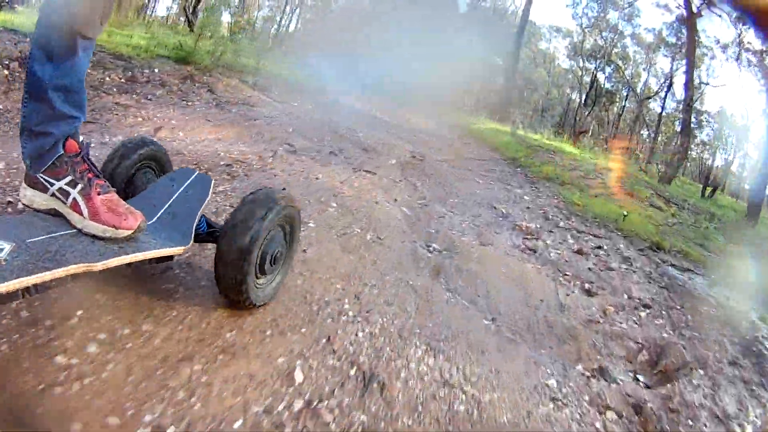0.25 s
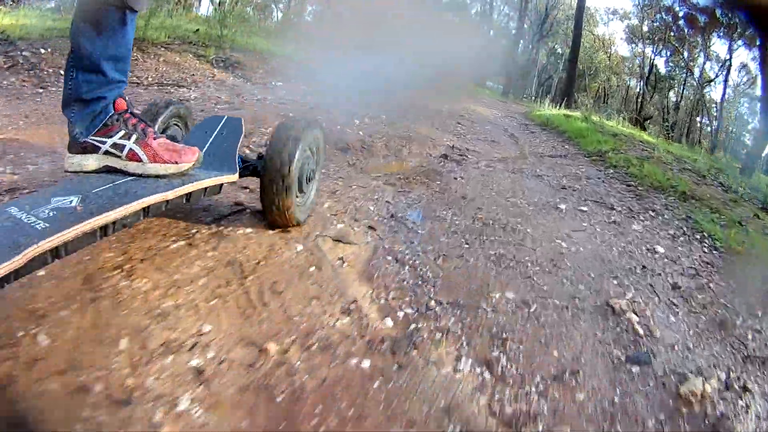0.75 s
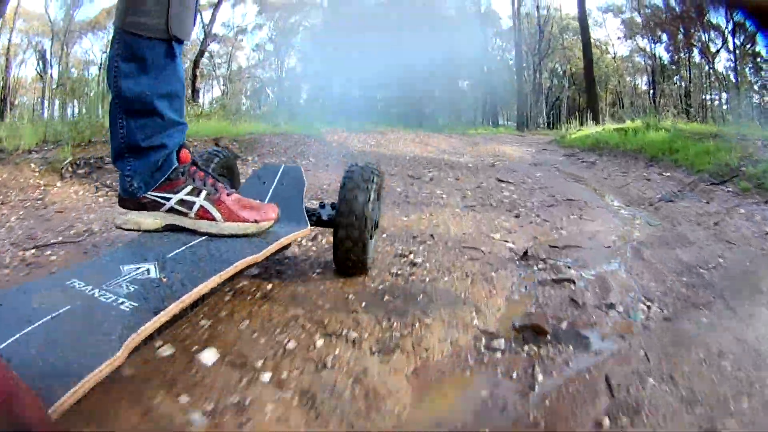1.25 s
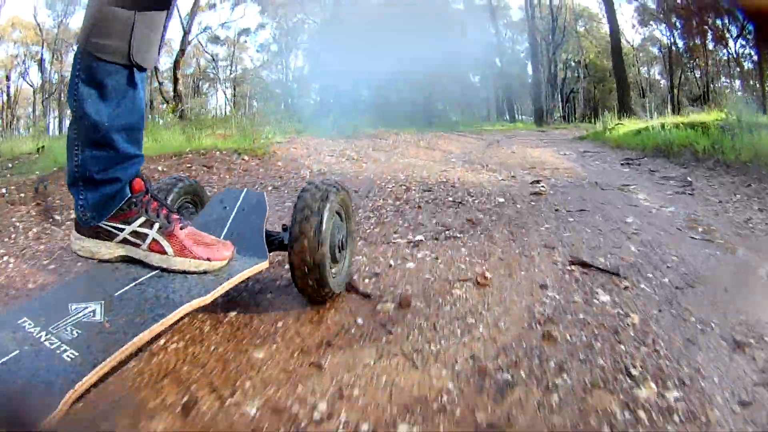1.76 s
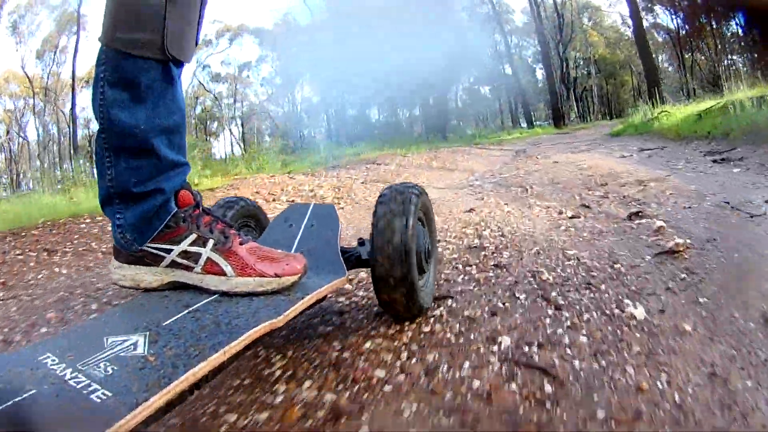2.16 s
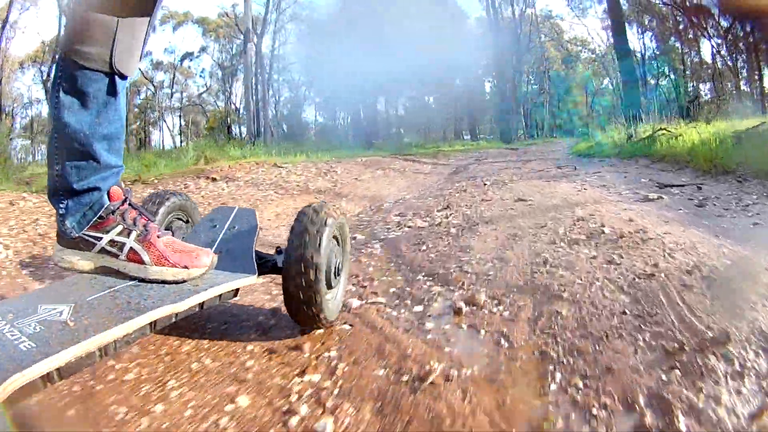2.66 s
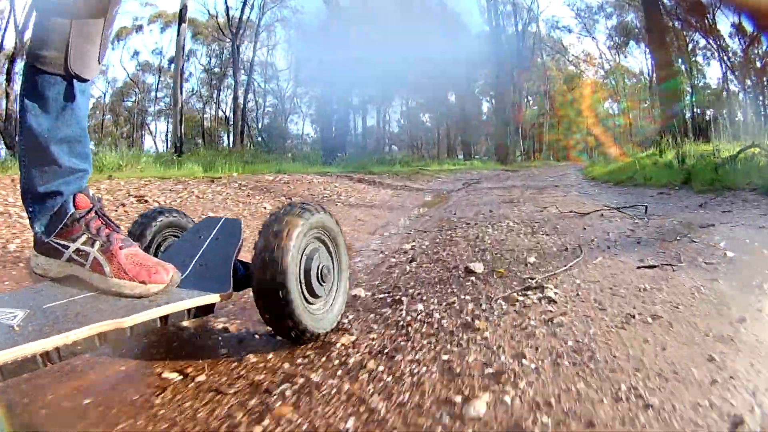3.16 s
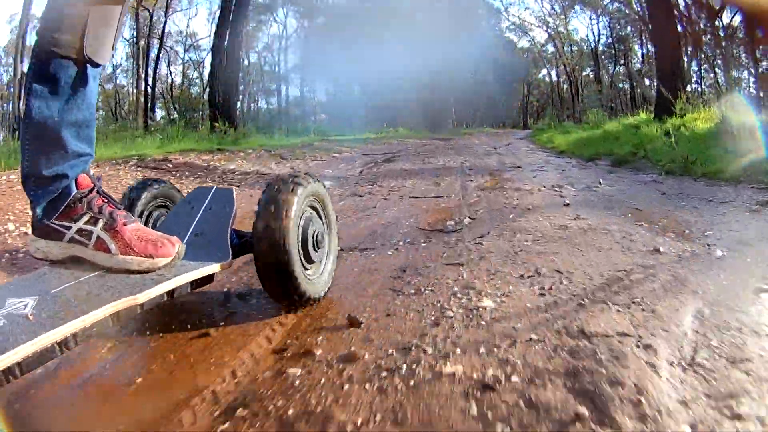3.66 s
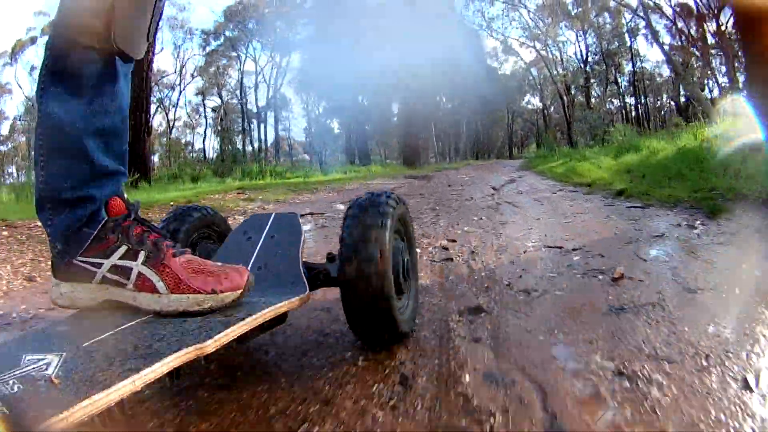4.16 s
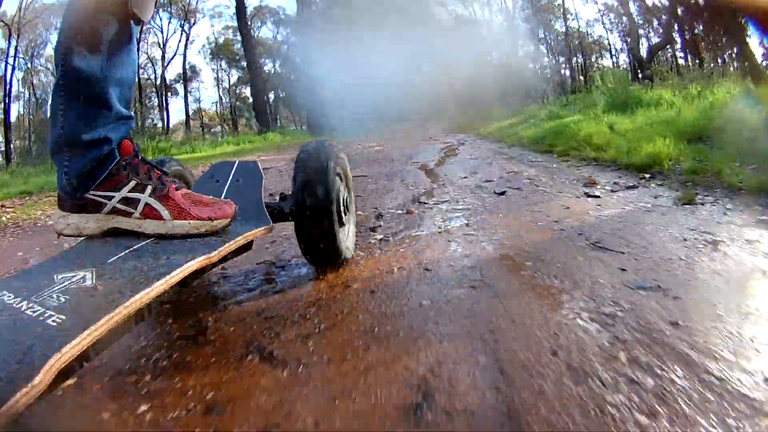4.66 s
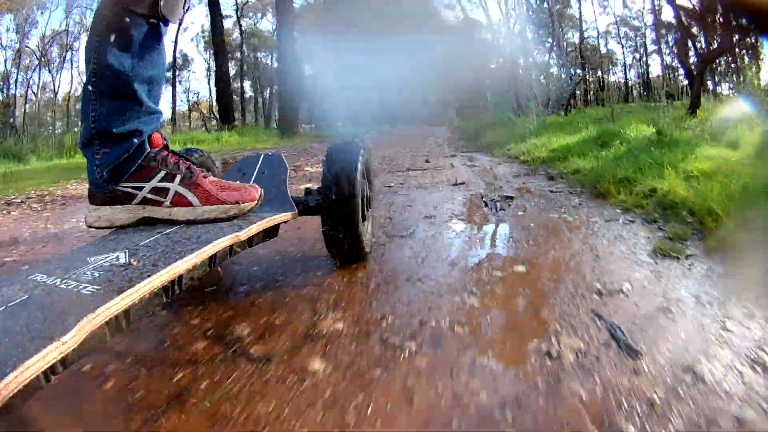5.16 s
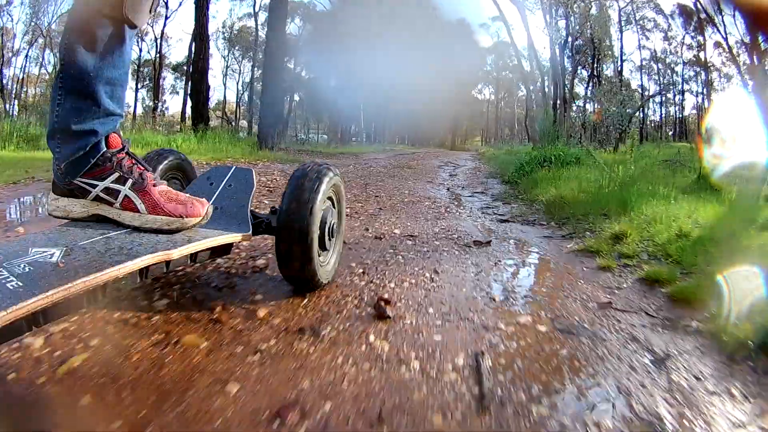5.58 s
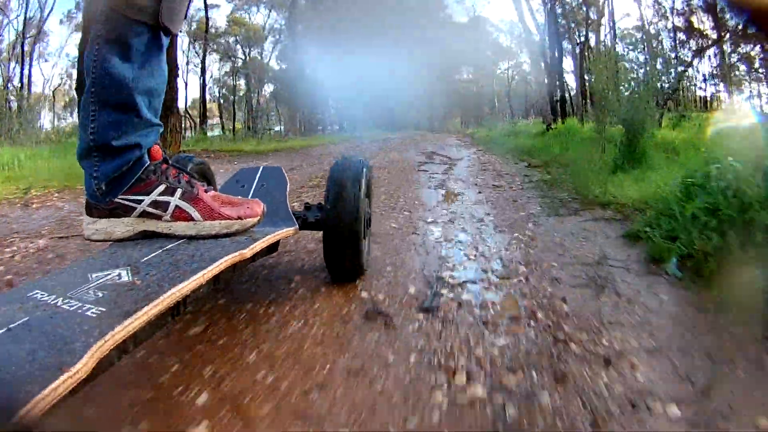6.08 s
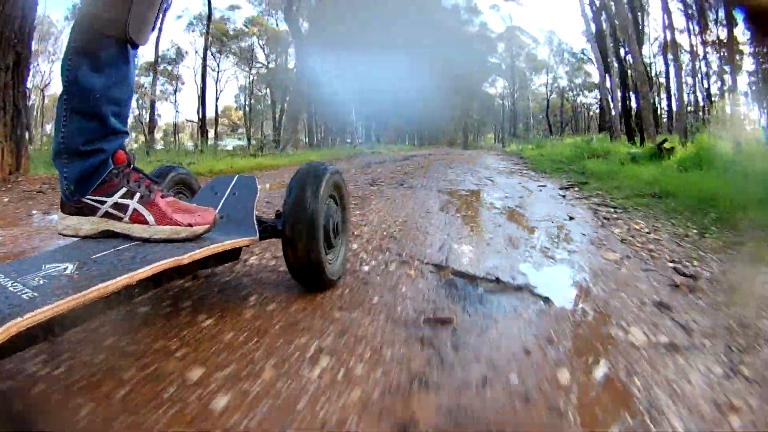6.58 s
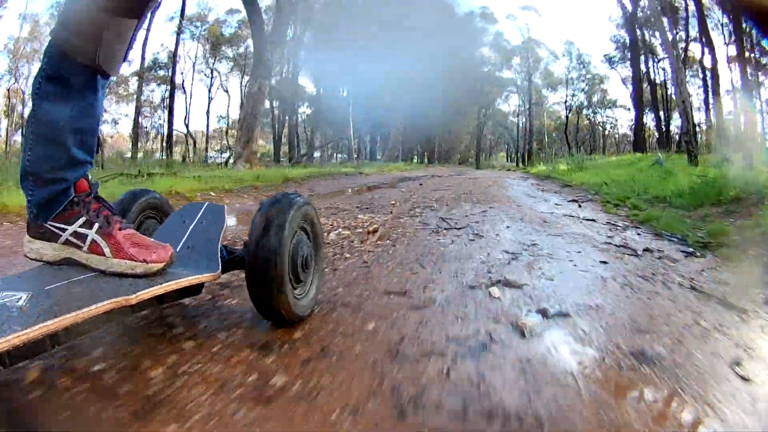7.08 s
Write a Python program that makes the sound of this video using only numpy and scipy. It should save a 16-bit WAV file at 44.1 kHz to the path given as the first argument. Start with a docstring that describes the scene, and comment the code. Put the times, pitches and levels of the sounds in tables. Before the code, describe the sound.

A small microphone in a wet housing rides close to an electric skateboard on a damp gravel track, so everything is near, dry and muffled on top. Throughout, air tyres give a continuous mid-low roar with a pattering tread, over low fluttering wind. From 0 to 2 seconds the grit is thin, with separate clicks, small stone pings and a few dull knocks. Around 2.4 to 2.7 a run of higher knocks rattles by. From 3 to 4 loose gravel crunches in brighter bursts with dense pings and fine wet spatter. At about 4.5 the wind rises sharply, thumping hard near 5.1, where bright stone strikes also snap at 5.2. It eases briefly around 5.5, a hard knock lands at 6.0, then strong low gusts buffet between 6.3 and 7. Rolling, coarse grit and heavy knocks stay loud until the cut at about 7.3.

```python
"""Wet gravel track: a small camera on a pole rides beside an electric skateboard, microphone inside.
Wind on the microphone is shaped noise under level curves, with single gusts as low damped tones.
Air tyres roar and patter as noise and grains, and knock over larger stones as short damped tones.
Grit, spray and loose patches are random cracks; flicked stones ring and snap, wet flecks spatter.
The wet housing muffles the treble and colours it with a few resonances and two notches."""
import sys
import numpy as np
from scipy import signal
from scipy.fft import rfft, irfft, next_fast_len
from scipy.io import wavfile
from scipy.ndimage import uniform_filter1d, map_coordinates

SR = 44100
rng = np.random.default_rng(int(sys.argv[2]) if len(sys.argv) > 2 else 0)


def materialize(psi):
    """Save the field psi as 16-bit PCM at rate SR to the path in sys.argv[1].

    A 1-D psi becomes a single channel; in a 2-D psi each row is a channel.
    """
    bounded = np.clip(np.atleast_2d(psi).T, -1, 1)
    quanta = np.round(bounded * 32767).astype(np.int16)
    wavfile.write(sys.argv[1], SR, quanta)


N = 323253  # samples


def amp(db):
    """Decibels to gain."""
    return 10 ** (np.asarray(db) / 20)


def unit(x):
    """Scaled to rms 1."""
    return x / np.sqrt(np.mean(x ** 2) + 1e-20)


def curves(rows):
    """One value per sample for each column after the time."""
    s, *columns = np.transpose(rows)
    return [np.interp(np.arange(N) / SR, s, column) for column in columns]


def wobble(rate):
    """A smooth random curve, rate knots a second."""
    knots = rng.standard_normal(int(N * rate / SR) + 4)
    return map_coordinates(knots, [np.arange(N) * rate / SR])


def filtered(x, response):
    """x times a complex response of frequency."""
    m = next_fast_len(N + SR // 2)
    spectrum = rfft(x, m) * response(np.fft.rfftfreq(m, 1 / SR))
    return irfft(spectrum, m)[..., :N]


def colour(points):
    """Gain of (Hz, dB) points joined on a log axis."""
    f, db = np.transpose(points)
    return lambda hz: amp(np.interp(np.log(hz + 1), np.log(f), db, left=-120, right=-120))


def causal(gain):
    """The minimum-phase response with this gain: it starts after its cause."""
    def response(f):
        cepstrum = irfft(np.log(gain(f)))
        half = len(cepstrum) // 2
        folded = np.r_[cepstrum[0], 2 * cepstrum[1:half], np.zeros(len(cepstrum) - half)]
        return np.exp(rfft(folded))
    return response


def modes(table):
    """Causal response of (Hz, width, dB) resonances; each is steep, two equal ones in a row."""
    def resonance(f, centre, width):
        return 1j * f * width / (centre * centre - f * f + 1j * f * width)
    return lambda f: sum(amp(db) * resonance(f, c, 1.13 * w) ** 2 for c, w, db in table)


def patchy(x, depth_db, size, bins=6):
    """x with patches of random gain, size frequency bins tall and bins time frames long."""
    z = signal.stft(x, nperseg=512)[2]
    field = uniform_filter1d(rng.standard_normal(z.shape), size=size, axis=0)
    field = uniform_filter1d(field, size=bins, axis=1)
    return signal.istft(z * amp(depth_db * unit(field)), nperseg=512)[1][:N]


def rush(points, patchy_db, lumps_db, rate):
    """Noise of rms 1 with patches of random gain and lumps in time."""
    x = patchy(rng.standard_normal(N + SR), patchy_db, size=4, bins=10)
    return unit(filtered(x * amp(lumps_db * wobble(rate)), colour(points)))


def grains(per_second, spread_db, bed):
    """Tiny cracks at random moments, some larger than the rest, over a bed of hiss."""
    draw = rng.random((2, N))
    sizes = amp(-spread_db * np.log(draw[1] + 0.02)) * (draw[0] < per_second / SR)
    decay = amp(-60 * np.arange(SR // 100) / SR / 0.0089)  # t60 8.9 ms
    cracks = np.convolve(sizes, decay)[:N] * rng.standard_normal(N)
    return unit(unit(cracks) + bed * rng.standard_normal(N))


def pings(events, cycles, rise):
    """Short damped tones; cycles = periods to die by 60 dB, rise = attack in periods."""
    out = np.zeros(N + SR)
    for s, db, hz in events:
        turns = hz * np.arange(int(1.5 * cycles / hz * SR)) / SR
        shape = amp(-60 * turns / cycles) * (1 - np.exp(-turns / rise))
        tone = shape / shape.max() * np.sin(2 * np.pi * turns)
        out[round(s * SR):][:len(turns)] += amp(db) * tone
    return out[:N]


def blows(events, gain_db):
    """One impulse for each event."""
    out = np.zeros(N)
    s, db = np.transpose(events)[:2]
    out[np.round(s * SR).astype(int)] = amp(db + gain_db)
    return out


# Wind on the microphone: t/s, strength level/dB, fast flutter level/dB re strength
WIND_CURVE = [(0, -30, -5), (.24, -28, -7.5), (.37, -30.5, -8.5), (1.47, -31, -5.5), (1.6, -36, -1),
              (2.3, -33, -8), (2.8, -32, -4), (3.3, -36, -2), (3.7, -29, -8), (4.25, -34.5, -1.5),
              (4.45, -23.5, -6.5), (4.57, -29, -5.5), (4.65, -22.5, -5), (4.78, -24.5, -2),
              (4.9, -23.5, -7), (5.05, -23, -2), (5.14, -21, -6), (5.3, -21, -10.5), (5.52, -29.5, -4),
              (5.65, -23, -8), (6.08, -25, -3), (6.3, -20, -5.5), (6.42, -22.5, -0.5), (6.49, -20, -5.5),
              (6.6, -17.5, -8.5), (6.94, -19.5, -4), (7.08, -23, -4.5), (7.2, -20.5, -17.5),
              (7.33, -20.5, -13)]
# Spectrum of the slowest eddies: f/Hz, relative level/dB per Hz
EDDY_COLOUR = [(12, -18.5), (22, -8.5), (45, -8.5), (80, -13.5), (160, -43.5)]
# Spectrum of the buffeting: f/Hz, relative level/dB per Hz
BUFFET_COLOUR = [(30, -17), (60, -0.5), (110, 1.5), (200, -4), (350, -15.5), (700, -23), (2000, -33),
                 (6000, -70)]
# Spectrum of the fast small eddies: f/Hz, relative level/dB per Hz
FLUTTER_COLOUR = [(90, -12.5), (180, -0.5), (280, 0), (420, -3.5), (800, -19.5)]
CALM_DB = -30.5  # reference wind strength
# level at that strength in dB; dB gained per dB of wind
EDDY_DB, EDDY_GROWS = -32.5, 0.35
BUFFET_DB, BUFFET_GROWS = -31, 0.94


def wind():
    """Eddies shed by the camera press on the microphone; buffeting follows wind strength most closely."""
    wind_db, flutter_db = curves(WIND_CURVE)
    gust_db = wind_db - CALM_DB
    eddy_gain = amp(EDDY_DB + EDDY_GROWS * gust_db)
    eddies = eddy_gain * rush(EDDY_COLOUR, patchy_db=-3.5, lumps_db=1.0, rate=9)
    buffet_gain = amp(BUFFET_DB + BUFFET_GROWS * gust_db + 0.85 * wobble(6.5))
    buffet = buffet_gain * rush(BUFFET_COLOUR, patchy_db=-0.1, lumps_db=1.5, rate=27)
    flutter = amp(wind_db + flutter_db) * rush(FLUTTER_COLOUR, patchy_db=-1.1, lumps_db=2.5, rate=70)
    return eddies + buffet + flutter


# Rolling tyres: t/s, roar level/dB, tread whirr level/dB re roar
ROLL_CURVE = [(0, -32, -6.5), (.7, -34, -8.5), (1.4, -34.5, -5.5), (1.5, -32.5, -8), (1.58, -36, -7.5),
              (2.1, -37.5, -8.5), (2.39, -34, -6), (2.7, -35.5, -5.5), (2.92, -32.5, -5.5), (2.98, -36, -5),
              (3.12, -33, -6), (3.35, -32, -9.5), (3.7, -34, -6), (4.3, -34.5, -5.5), (4.58, -35, -2),
              (4.65, -30.5, -8), (4.8, -34, -4.5), (5.12, -32, -4), (5.4, -31.5, -3), (5.9, -31, -5.5),
              (6.17, -31, -2), (6.33, -29, -8.5), (6.43, -29, -1.5), (6.5, -31.5, -3.5),
              (6.62, -30.5, -5.5), (6.96, -30.5, -2), (7.33, -31, 1)]
# Spectrum of the carcass roar: f/Hz, relative level/dB per Hz
ROAR_COLOUR = [(60, -20), (200, -9.5), (400, -2), (600, -1.5), (830, -2.5), (1050, -13), (1600, -19.5),
               (3000, -91.5)]
# Spectrum of the tread: f/Hz, level/dB per Hz (relative in the patter)
TREAD_COLOUR = [(600, -18.5), (1000, 0), (1300, 2.5), (1550, -3), (1900, -12), (2400, -22), (4000, -32),
                (7000, -53)]


def tyres():
    """Rolling roar of the carcass and pattering tread, shaken together by the bumps of the track."""
    roar_db, tread_db = curves(ROLL_CURVE)
    bumps_db = 0.24 * wobble(60) + 0.6 * wobble(14)
    roar = amp(roar_db + bumps_db) * rush(ROAR_COLOUR, patchy_db=-0.27, lumps_db=1.17, rate=190)
    cracks = grains(per_second=500, spread_db=2.5, bed=0.95)
    patter = unit(filtered(cracks, causal(colour(TREAD_COLOUR))))
    tread_gain = amp(roar_db + tread_db + bumps_db) + tread_rattle()
    return roar + tread_gain * patter


# The grit dips briefly: middle t/s, depth level/dB, length t/s
GRIT_LULLS = [(0.933, 7, .02), (1.1, 13, 0.022), (1.287, 8, 0.014), (1.427, 10, 0.014), (1.73, 14, 0.023),
              (1.793, 7, .025), (2.085, 5, 0.019), (2.287, 4, 0.018), (3.03, 5, .025), (3.217, 0, 0.022),
              (3.298, 18, .01), (3.482, 6, .025), (4.433, 2, 0.026), (4.52, 5, 0.054), (4.637, 21, 0.014),
              (4.948, 4.5, 0.017)]


def looseness():
    """Small patches raise every size of grit at once, and brief lulls lower it; in dB."""
    loose_db = 0.84 * wobble(8.9) + 0.77 * wobble(30)
    for s, depth_db, length in GRIT_LULLS:
        near = np.arange(round(s * SR) - SR // 10, round(s * SR) + SR // 10)
        lengths_away = (near / SR - s) / max(length, .005)
        loose_db[near] -= depth_db / (1 + (2 * lengths_away) ** 2)
    return loose_db


# Grit before looseness and loose patches: t/s, coarse level/dB, fine level/dB
GRIT_CURVE = [(0.0, -67.5, -69), (0.73, -62, -66.5), (1.04, -63, -64.5), (1.53, -60, -69), (1.86, -58, -64),
              (1.98, -57, -64), (2.15, -59, -68.5), (2.47, -59.5, -66), (2.75, -57.5, -63.5),
              (3.16, -54.5, -57), (3.23, -61, -62), (4.06, -53.5, -53), (4.49, -51, -60.5),
              (4.8, -50.5, -60.5), (5.1, -53, -63.5), (5.65, -54.5, -57.5), (6.19, -53, -63.5),
              (6.49, -52, -61), (6.76, -50.5, -56), (7.33, -46.5, -57)]
# Wet spray before looseness and loose patches: t/s, level/dB
WET_CURVE = [(0.0, -85), (0.58, -81), (0.85, -79), (1.71, -78), (2.0, -74.5), (2.18, -77), (3.11, -74),
             (3.23, -74.5), (3.96, -70), (4.4, -70), (4.62, -71), (4.76, -69), (5.09, -74.5), (5.9, -69),
             (6.22, -73.5), (6.5, -75), (6.76, -71), (7.25, -72)]


def gravel():
    """Grit and spray crackle all along and burst out where a tyre crosses a loose patch."""
    coarse_db, fine_db = curves(GRIT_CURVE)
    wet_db = curves(WET_CURVE)[0]
    coarse_db = coarse_db + 1.6 * wobble(40)  # coarse grit swells by itself
    coarse, fine, wet = amp(np.array([coarse_db, fine_db, wet_db]) + looseness())
    add_loose_patches(coarse, fine, wet)
    shared = grains(per_second=900, spread_db=4.5, bed=0.69)  # one crack sounds in every range
    grit = coarse * coarse_grit(shared) + fine * fine_grit(shared) + wet * wet_spray(shared)
    small_stones = pebbles(coarse * amp(-11.5), per_second=98)
    return grit + small_stones + ticks(coarse * amp(-11.5), per_second=99, spread_db=3.0)


# Housing modes rung by coarse grit and stones: f/Hz, nominal width/Hz, level/dB
HOUSING_MODES = [(2610, 490, 6), (3815, 440, 7.5), (2050, 1100, 3)]
# Second colour of the coarse grit, clearer and higher: f/Hz, nominal width/Hz, level/dB
CLEAR_MODES = [(2850, 480, 10.5), (4080, 560, 5), (2130, 1800, 2.5)]
# Blend of the two colours: t/s, share of the second (0-1)
CLEAR_SHARE = [(0, 0.2), (1.7, 0.5), (1.9, 1), (2.7, 0.7), (3.0, 0.35), (4.4, 0.43), (4.6, 0.93),
               (5.0, 0.5), (5.6, 0.27), (7.33, 0.26)]


def coarse_grit(shared):
    """Coarse cracks ring housing modes, drifting between two colours."""
    cracks = shared + 1.08 * grains(per_second=300, spread_db=1.0, bed=0.82)
    share = np.clip(curves(CLEAR_SHARE)[0], 0, 1)
    dull = unit(filtered(cracks, modes(HOUSING_MODES)))
    clear = unit(filtered(cracks, modes(CLEAR_MODES)))
    return unit((1 - share) * dull + share * clear)


# Fine grit through the housing: f/Hz, relative level/dB per Hz
FINE_COLOUR = [(3000, -34), (4400, -17), (4950, -4), (5300, 4.5), (5600, 10.5), (5950, 6.5), (6500, 4.5),
               (7200, -0.5), (8200, -12), (9500, -24)]


def fine_grit(shared):
    """Fine cracks coloured by the housing, their treble patchy."""
    cracks = shared + 0.52 * grains(per_second=350, spread_db=4.0, bed=0.5)
    return unit(patchy(filtered(cracks, causal(colour(FINE_COLOUR))), depth_db=1.5, size=10))


# Wet spray and flecks through the housing: f/Hz, relative level/dB per Hz
SPRAY_COLOUR = [(7000, -28), (8000, -17), (8600, 9.5), (9300, -1.5), (10200, 1), (11100, -5.5), (12000, 3),
                (12900, -5), (14600, -9), (16500, -19)]


def wet_spray(shared):
    """Spray is the top of the crackle, patchier than the fine grit."""
    cracks = 0.7 * shared + 1.1 * grains(per_second=350, spread_db=2.5, bed=0.5)
    return unit(patchy(filtered(cracks, causal(colour(SPRAY_COLOUR))), depth_db=3.0, size=18))


def pebbles(level, per_second):
    """Many small pebbles tick, each at its own pitch and size."""
    draw = rng.random((1500, 3))
    s = np.cumsum(-np.log(draw[:, 0] + 1e-6) / per_second)
    size_db = -4.5 * np.log(draw[:, 1] + .04)
    hz = 2300 * 2.6 ** draw[:, 2]
    rows = np.c_[s, size_db, hz][s < N / SR]
    return level * unit(pings(rows, cycles=17, rise=0.56))


# Crack of a stone or stray grain through the housing: f/Hz, level/dB per Hz (relative for grains)
SNAP_COLOUR = [(1500, -20.5), (2300, 1.5), (3300, 1.5), (4500, -2.5), (5600, -14), (6800, -12.5),
               (8500, -28.5), (15000, -37.5)]


def ticks(level, per_second, spread_db):
    """Stray grains crack singly and in clumps."""
    draw = rng.random((3, N))
    rate = per_second * amp(6.7 * wobble(12))
    sizes = amp(-spread_db * np.log(draw[1] + .03))
    hits = (draw[0] < rate / SR) * sizes * np.sign(draw[2] - .5)
    return level * unit(filtered(hits, causal(colour(SNAP_COLOUR))))


# Tyres knock over larger stones: t/s, ring peak level/dB, f/Hz
KNOCK_EVENTS = [(.069, -24, 646), (.683, -28, 700), (.827, -33.5, 800), (.948, -24.5, 520),
                (1.44, -27.5, 567), (1.496, -20, 720), (2.024, -28, 595), (2.383, -29, 775),
                (2.411, -26, 1100), (2.456, -21, 1190), (2.533, -27.5, 1300), (2.567, -27.5, 1250),
                (2.627, -28, 1500), (2.658, -25, 1330), (2.859, -25, 678), (3.04, -24.5, 595),
                (3.13, -25, 1000), (3.15, -28, 900), (3.263, -17, 785), (3.278, -19.5, 1140),
                (3.662, -19, 895), (3.944, -22, 700), (4.626, -19.5, 686), (4.918, -24, 611),
                (5.108, -23.5, 1400), (5.186, -21.5, 1400), (5.322, -25, 1100), (5.39, -18.5, 760),
                (5.984, -20, 1400), (6.014, -12.5, 800), (6.121, -25.5, 1500), (6.137, -26, 1400),
                (6.147, -20, 1090), (6.157, -19, 1200), (6.242, -23, 700), (6.398, -25.5, 500),
                (6.425, -14, 380), (6.455, -21.5, 1240), (6.535, -23, 605), (6.665, -18, 1240),
                (6.921, -18, 510), (7.039, -19.5, 1140), (7.162, -13.5, 770), (7.207, -14.5, 1140)]


def knocks():
    """A larger stone rings a short damped tone and jolts the tread."""
    ring = pings(KNOCK_EVENTS, cycles=7.8, rise=0.26)
    jolt = blows(KNOCK_EVENTS, 11)  # dB re ring
    return ring + filtered(jolt, causal(colour(TREAD_COLOUR)))


def tread_rattle():
    """Gain by which the tread rattles on after each knock, dying fast."""
    t = np.arange(SR // 10) / SR
    shape = (1 - np.exp(-(t / .003) ** 2)) * amp(-60 * t / 0.017)  # rise 3 ms, t60 17 ms
    return signal.fftconvolve(blows(KNOCK_EVENTS, -6), shape)[:N]  # -6 dB re ring, before shape


# Loose gravel patches: t/s, fine level/dB, coarse level/dB re fine, length t/s
PATCHES = [(.149, -58, 2, 0.0087), (.264, -71, 5, 0.024), (.64, -69, -8, .031), (0.73, -64, 3, 0.016),
           (0.889, -61, 7, 0.033), (0.965, -52.5, -2, 0.027), (1.04, -70, 15, 0.02), (1.125, -62, 7, 0.017),
           (1.167, -65, 5, 0.028), (1.354, -66, 15.5, 0.02), (1.998, -68, -10, 0.027),
           (2.051, -55, 1, 0.013), (2.114, -73.5, 16, .04), (2.298, -72, 16, .02), (2.436, -71, 10, 0.027),
           (2.563, -73, 18, .022), (2.617, -69, 13, 0.022), (2.82, -59, 5, 0.022), (2.873, -54, 4, 0.016),
           (3.043, -53, -2, 0.046), (3.093, -46, -3, 0.036), (3.223, -58, 4, 0.035), (3.264, -54, 6, 0.028),
           (3.304, -52.5, -3.5, 0.08), (3.388, -54.5, 2, 0.062), (3.484, -51.5, 1.5, 0.021),
           (3.538, -68, 15, 0.022), (3.621, -56, 2, 0.017), (3.668, -62, 7, 0.065), (3.856, -56, 0, 0.025),
           (3.955, -64, 6, 0.031), (4.036, -56, -7, 0.036), (4.135, -68.5, 12, 0.022),
           (4.318, -62, 14, 0.033), (4.36, -71, 16, 0.045), (4.556, -63, 8.5, 0.11),
           (4.662, -77, 11, 0.034), (4.814, -58, -2, 0.054), (4.922, -57, 4, 0.014), (5.673, -62, 3, 0.018),
           (5.755, -59, -4, 0.016), (5.8, -55, 3, 0.011), (6.01, -59, 1, 0.0099), (6.487, -77, 3, 0.028),
           (6.574, -62, -6, 0.048), (6.659, -65, 10, .035), (7.13, -53.5, 2, 0.025),
           (7.193, -66, -8, 0.023), (7.265, -52, -13, 0.022)]


def add_loose_patches(coarse, fine, wet):
    """Each patch adds to all three gains in place: sudden start, flat top, quick end."""
    t = np.arange(SR // 4) / SR
    for s, db, coarse_db, length in PATCHES:
        shape = (1 - np.exp(-t / 0.0024)) / (1 + (t / max(length, .005)) ** 6)  # rise 2.4 ms
        span = slice(round(s * SR), round(s * SR) + len(t))
        shape = amp(db) * shape[:len(fine[span])]
        fine[span] += shape
        coarse[span] += amp(coarse_db) * shape
        wet[span] += amp(-16) * shape  # spray, dB re fine


# Flicked stones, before the offsets below: t/s, ring level/dB, f/Hz, snap level/dB
STONE_EVENTS = [(.182, -40, 3800, -52), (.268, -45, 5600, -56), (.31, -46, 4200, -52),
                (0.396, -46, 4800, -46), (.705, -50, 4300, -52), (.7383, -35, 2620, -57),
                (.7821, -38, 2690, -49), (.827, -42, 2600, -62), (.897, -39, 3090, -52),
                (1.054, -42, 3070, -54), (1.103, -43, 2600, -45), (1.202, -31, 2720, -55),
                (1.3099, -42, 2790, -46), (1.3349, -40, 2750, -50), (1.3578, -36.5, 2860, -47),
                (1.3814, -47, 5500, -52), (1.4192, -46, 3400, -56), (1.4461, -41, 2660, -50),
                (1.5145, -44, 3240, -53), (1.6472, -43, 2930, -54), (1.8188, -45, 2860, -59),
                (1.9051, -42, 2870, -54.5), (2.0018, -42, 5300, -43), (2.0554, -44, 2950, -55),
                (2.1051, -43, 3080, -58), (2.1745, -42, 2890, -57), (2.3007, -43, 2800, -56),
                (2.4254, -45, 5600, -52), (2.453, -44, 2850, -54), (2.4833, -39, 2770, -55),
                (2.568, -37, 2750, -55), (2.6245, -31, 2450, -58), (2.751, -37, 2860, -56),
                (2.81, -38, 2970, -47), (2.8744, -31, 3400, -47), (2.8998, -32, 2750, -48),
                (2.941, -42, 2630, -53), (3.0515, -38, 2810, -47), (3.085, -30, 5700, -40),
                (3.097, -35, 5610, -41.5), (3.2236, -42, 3660, -51), (3.24, -32, 2870, -51),
                (3.3087, -30, 5400, -47), (3.362, -27, 5500, -44), (3.49, -36, 5510, -47),
                (3.532, -43, 2850, -52), (3.6022, -39, 5520, -50), (3.6275, -28, 2670, -50),
                (3.6651, -33, 2720, -50), (3.707, -32, 2660, -48), (3.7525, -34, 2940, -47),
                (3.79, -33, 3060, -43), (3.8, -27, 3400, -48), (3.8536, -35, 2900, -47),
                (3.8711, -25, 2920, -49), (3.8834, -35, 5970, -50), (3.9569, -39, 5580, -46),
                (4.0941, -44, 2890, -47), (4.139, -39, 3130, -48), (4.3246, -27, 3770, -39),
                (4.338, -38, 3800, -44), (4.347, -38, 3700, -45.5), (4.407, -38, 2950, -48),
                (4.546, -43, 2820, -50), (4.8145, -37, 3030, -44), (4.9204, -42, 2960, -46),
                (4.9626, -32, 3020, -49), (5.0, -39, 6800, -55), (5.008, -43, 6900, -58),
                (5.082, -38, 4300, -42), (5.197, -24.5, 2780, -36), (5.206, -40, 4700, -43.5),
                (5.2215, -23, 3870, -34.5), (5.2225, -32, 2300, -50), (5.2444, -40, 4700, -49),
                (5.284, -34, 2500, -48), (5.291, -41, 5900, -56), (5.372, -39, 6200, -45),
                (5.6126, -32, 2650, -47.5), (5.659, -42, 2660, -45), (5.7644, -43, 2830, -49),
                (5.8056, -38, 2680, -45), (5.985, -28, 2840, -45), (6.016, -29, 3100, -48),
                (6.112, -41, 2940, -46), (6.157, -41, 2720, -45), (6.4956, -40, 5200, -49),
                (6.5774, -38, 5800, -48), (6.6712, -40, 5600, -50), (6.9157, -36, 2730, -45),
                (7.126, -27, 2800, -42)]
RING_DB, CLICK_DB = -5, 7.5  # ring and click together; the blow on the housing re the ring
CHIP_DB, CRACK_DB = 4.5, 12  # chip and broad crack, re snap


def stones():
    """A flicked stone cracks broadly, chips and rings at its own pitch and clicks in the housing modes."""
    s, db, hz, snap_db = np.transpose(STONE_EVENTS)
    ring = pings(np.c_[s, db, hz], cycles=15, rise=1.0)
    click = filtered(blows(STONE_EVENTS, CLICK_DB), modes(HOUSING_MODES))
    chip = pings(np.c_[s, snap_db + CHIP_DB, hz], cycles=5, rise=0.28)
    crack = filtered(blows(np.c_[s, snap_db], CRACK_DB), causal(colour(SNAP_COLOUR)))
    return amp(RING_DB) * (ring + click) + chip + crack


# Wet flecks hit the housing: t/s, starting level/dB of the spatter
FLECK_EVENTS = [(0.2682, -62), (1.3807, -52), (2.4098, -56), (2.8219, -53), (2.8808, -53), (3.0833, -51),
                (3.0963, -46), (3.2265, -51), (3.2659, -54), (3.3068, -55), (3.492, -57), (3.5856, -56),
                (4.0444, -53), (4.148, -53), (4.321, -53), (4.5789, -55), (4.8403, -52), (4.9151, -54),
                (5.8031, -48), (5.842, -57), (5.8625, -54), (6.0106, -43), (6.495, -56), (6.6272, -53),
                (6.7265, -52), (6.786, -57), (7.157, -52), (7.2678, -52)]


def flecks():
    """Single wet flecks spatter on the housing as noise, a few milliseconds each."""
    decay = amp(-60 * np.arange(SR // 50) / SR / .006)  # t60 6 ms
    spatter = np.convolve(blows(FLECK_EVENTS, 0), decay)[:N]
    return spatter * unit(filtered(rng.standard_normal(N), colour(SPRAY_COLOUR)))


# Single gusts on the microphone port, before its leak: t/s, peak level/dB, f/Hz
GUSTS = [(.593, -17, 120), (1.443, -19, 112), (1.744, -21, 102), (2.604, -19, 82), (3.129, -23, 46.4),
         (3.744, -15, 53.4), (4.451, -16.5, 95.5), (4.64, -13, 203), (4.665, -16, 100), (4.69, -15, 190),
         (4.89, -10, 95), (5.025, -8.5, 90), (5.112, -15, 170), (5.132, -4.5, 142), (5.203, -12, 150),
         (5.298, -9, 150), (5.62, -17, 110), (5.71, -14.5, 190), (5.945, -15, 90), (6.095, -13, 150),
         (6.195, -11, 140), (6.278, -16, 95), (6.317, -6.5, 131), (6.34, -10, 221), (6.531, -7.5, 65.5),
         (6.568, -15, 120), (6.726, -6, 80), (6.76, -8, 130), (6.85, -8, 190), (6.87, -5, 188),
         (6.918, -6, 150), (6.939, -9, 130), (7.14, -15, 130), (7.178, -12, 95)]


def thumps():
    """A strong gust thumps as a damped tone; the port lets its slowest part leak away."""
    leak_hz = 45
    gusts = pings(GUSTS, cycles=4.15, rise=0.53)
    return filtered(gusts, lambda f: (1j * f / (leak_hz + 1j * f)) ** 2)


def scene():
    """All sources at one microphone."""
    rolling = tyres() + gravel() + knocks()
    return (wind() + rolling + stones() + flecks() + thumps())[None]


# Bands the housing weakens: f/Hz, width/Hz, core width/Hz
HOUSING_NOTCHES = [(7950, 700, 230), (13400, 1500, 800)]
# Microphone self noise: f/Hz, relative level/dB per Hz
HISS_COLOUR = [(1500, -11), (4000, -14), (7000, -9.5), (9000, -5), (13000, -6.5), (16000, -8)]
TOP_HZ = 15780  # band limit


def record(dry):
    """The housing notches narrow bands, the microphone adds its hiss; nothing passes the band limit."""
    def notch(f, centre, wide, core):
        detune = centre * centre - f * f
        return ((detune + 1j * f * core) / (detune + 1j * f * wide)) ** 2
    housed = filtered(dry, lambda f: np.prod([notch(f, *row) for row in HOUSING_NOTCHES], axis=0))
    hiss = amp(-81) * unit(filtered(rng.standard_normal(N), colour(HISS_COLOUR)))
    return filtered(housed + hiss, lambda f: f < TOP_HZ)


dry = scene()
out = record(dry)
materialize(out)
```